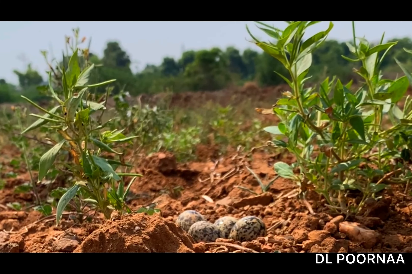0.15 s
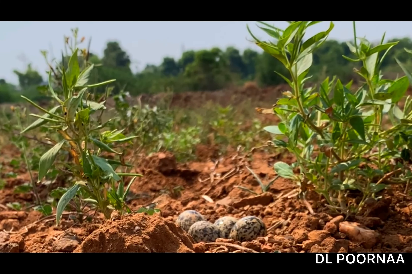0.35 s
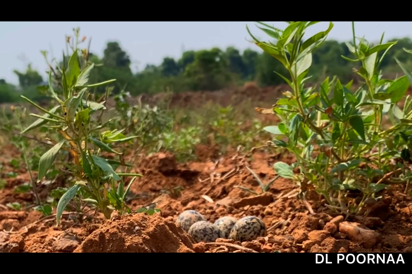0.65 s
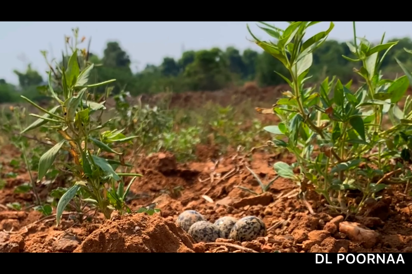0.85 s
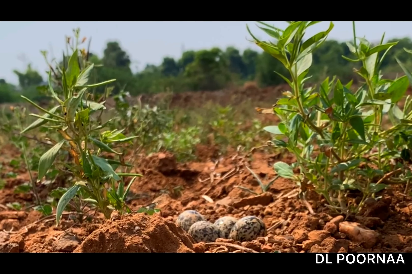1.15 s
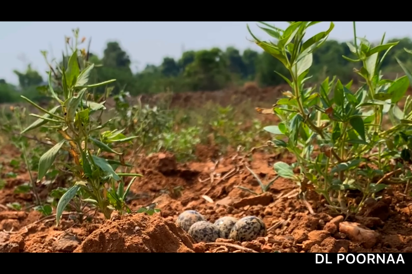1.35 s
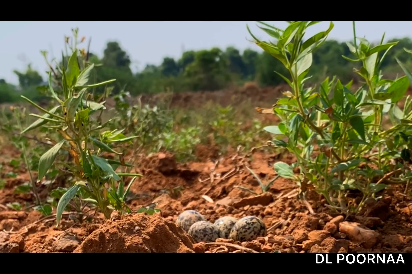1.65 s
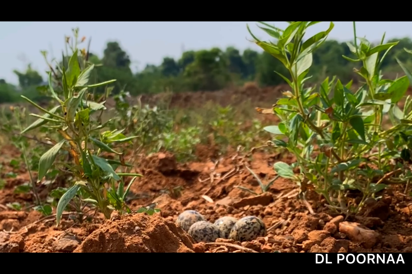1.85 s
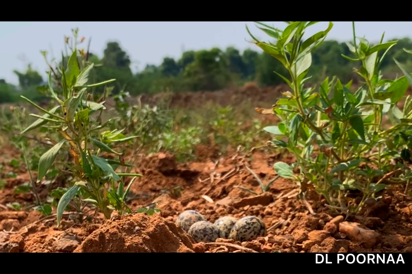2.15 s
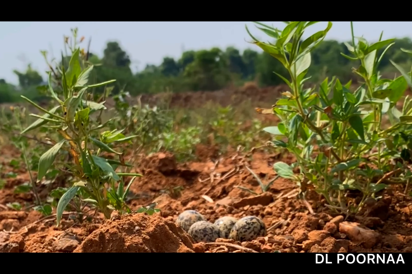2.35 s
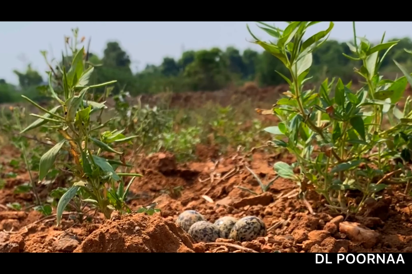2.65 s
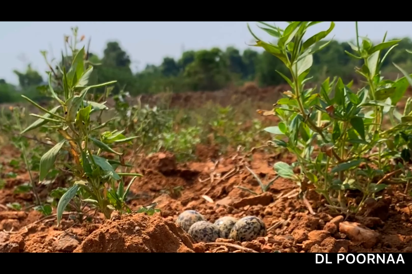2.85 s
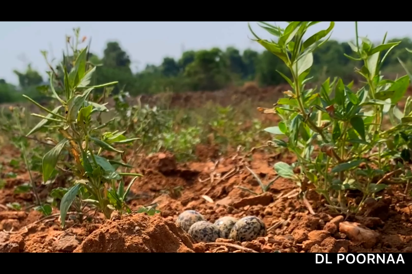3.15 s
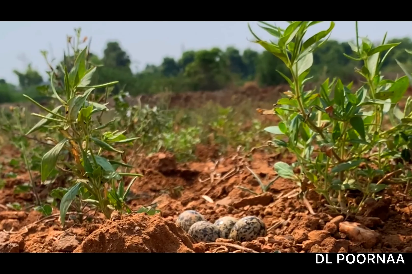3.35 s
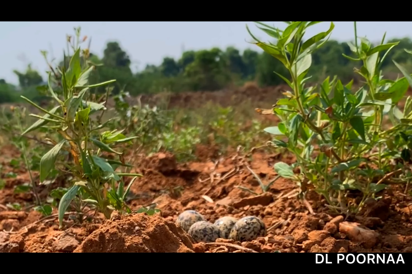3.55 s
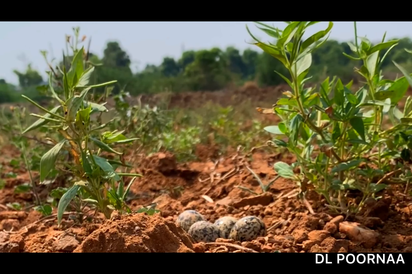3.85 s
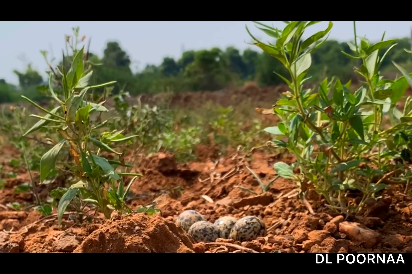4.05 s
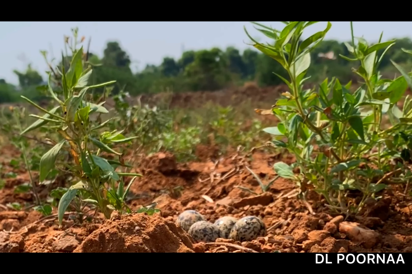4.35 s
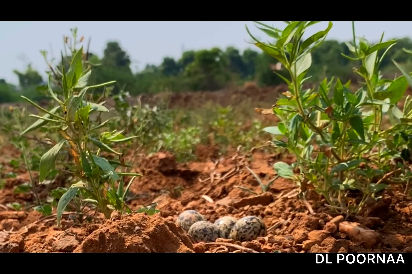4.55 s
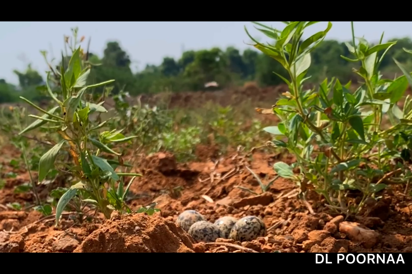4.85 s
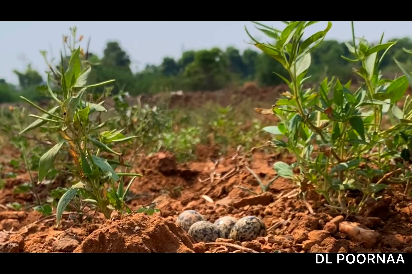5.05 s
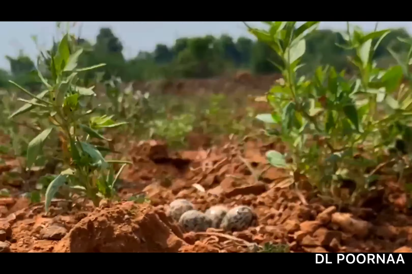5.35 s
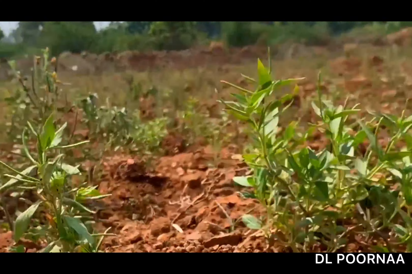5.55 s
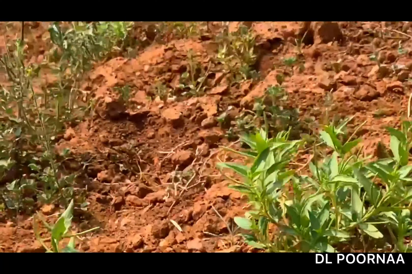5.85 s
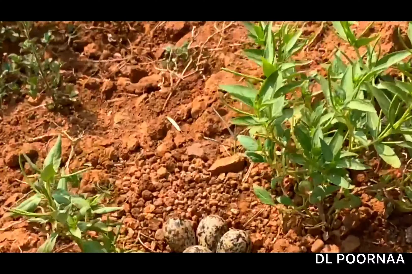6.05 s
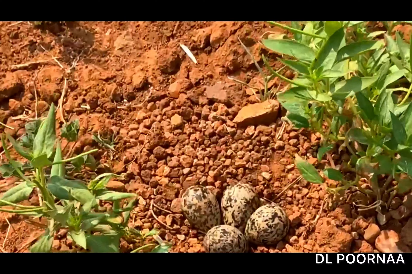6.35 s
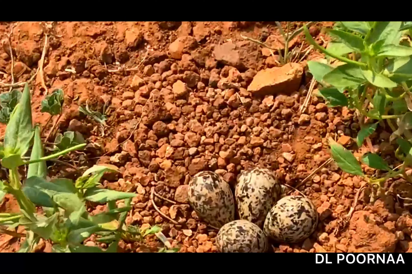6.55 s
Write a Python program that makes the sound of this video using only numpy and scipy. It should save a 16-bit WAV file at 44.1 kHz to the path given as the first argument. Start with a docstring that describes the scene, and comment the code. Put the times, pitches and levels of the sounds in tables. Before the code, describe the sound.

In an open field, low wind rumble presses unevenly on a small hand-held stereo microphone. Within the first second the grip shifts: heavy bassy jolts, dull finger knocks and tiny bright crackles. After that the rumble settles into soft uneven swells with weaker bumps, while faint birds chip, whistle and slide downward on both sides over a very quiet hush.

```python
"""Low rumbles swell and jolt as wind buffets a small hand-held recorder in an open field; a few finger
knocks and tiny crackles reach it through the case, and distant birds call left and right over a hush.
The rumble is noise-driven low resonances with brief swings on top, the knocks are decaying case modes,
the birds are gliding sines with scattered echoes, and the hush is shaped random spectra."""
import sys
import numpy as np
from scipy import signal
from scipy.io import wavfile
from scipy.ndimage import uniform_filter1d

SR = 44100
rng = np.random.default_rng(int(sys.argv[2]) if len(sys.argv) > 2 else 0)


def store_wav(level_fs):
    """Save 16-bit WAV to argv[1]."""
    pcm = np.round(np.clip(np.atleast_2d(level_fs), -1, 1) * 32767)
    wavfile.write(sys.argv[1], SR, pcm.T.astype(np.int16))


def gain_from_db(level_db):
    """Turn a decibel level (scalar or array-like) into a linear amplitude factor."""
    decades = np.asarray(level_db, float) / 20
    return 10 ** decades


N = 295760

# sudden jolts of air or hand: t/s, level/dB, f/Hz
JOLTS = [(0.3, -17.5, 64), (0.372, -13.5, 65), (0.427, -19.5, 76.4), (0.702, -7, 112), (0.718, -21, 102),
         (0.733, -17, 114), (0.785, -18, 80.5), (1.099, -28, 84), (2.225, -26, 98), (3.227, -27.5, 101),
         (3.661, -28, 92), (4.416, -23.5, 88.5), (4.788, -27, 88.5), (5.177, -25, 77)]
GLIDE_BEND = 0.72  # under 1: the pitch of a held note moves fast first, then levels


def evened(x):
    """Scales to rms 1."""
    return x / np.sqrt(np.mean(x ** 2))


def read(points, hz):
    """Reads a table on a log frequency axis."""
    f, value = np.transpose(points)
    return np.interp(np.log(hz + 1), np.log(f + 1), value)


def halves(difference):
    """Splits a left-right difference evenly: half up on the left, half down on the right."""
    return np.array([[0.5], [-0.5]]) * difference


def add(mix, s, sound, pan_db):
    """Adds a sound to both channels at time s; a positive pan_db leans left."""
    part = mix[:, round(s * SR):][:, :sound.shape[-1]]
    panned = sound * gain_from_db(halves(pan_db))
    part += panned[:, :part.shape[1]]


def hush():
    """The hush of the field and the microphone hiss: random short-time spectra with faint drifting patches."""
    # spectrum of the hush, then of the hiss: f/Hz, relative density/dB per Hz
    hush_shape = [(60, -15.5), (110, -11), (190, -21.5), (357, -26.5), (700, -28.5), (2500, -41),
                  (7500, -47.5), (16000, -49)]
    # likeness of the two channels: f/Hz, likeness (0 to 1)
    channel_likeness = [(150, 0.054), (640, 0.5), (3100, 0.36), (7000, 0.062)]
    # balance of the two channels: f/Hz, left-right level/dB
    channel_lean = [(150, 0), (700, -3), (2400, -2.5), (8000, 0.5)]
    level_db = -58  # rms of the part above some 200 Hz
    frames = N // 256 + 5
    hz = np.fft.rfftfreq(1024, 1 / SR)[:, None]
    a, b, c, d, patches = rng.standard_normal((frames, 513, 5)).T
    patches = uniform_filter1d(patches, size=14, axis=0)  # across frequency
    patches = evened(uniform_filter1d(patches, size=16, axis=1))  # across time
    same = np.clip(read(channel_likeness, hz), -1, 1)
    left = a + 1j * b
    right = same * left + np.sqrt(1 - same ** 2) * (c + 1j * d)
    shape = gain_from_db(read(hush_shape, hz)) * (hz > 50) * (hz < 15720)
    lean_db = np.array([0.5, -0.5])[:, None, None] * read(channel_lean, hz)
    spectra = np.array([left, right]) * shape * gain_from_db(1.01 * patches + lean_db)
    sound = signal.istft(spectra, nperseg=1024, noverlap=768)[1][:, :N]
    return gain_from_db(level_db) * evened(sound) * np.linalg.norm(shape) / np.linalg.norm(shape[5:])


def whistle(length, from_hz, to_hz, db, bend=1.3, waver=0.12, flutter_db=2.5):
    """A near sine that glides; moving air makes its pitch waver and its level flutter."""
    u = np.linspace(0, 1, round(length * SR))
    # averaging 200 samples shrinks the noise to 1 / sqrt(200); waver acts on that shrunken drift
    drift, flutter = uniform_filter1d(rng.standard_normal((2, 12000)), size=200)[:, :len(u)]
    hz = (from_hz + (to_hz - from_hz) * u ** bend) * (1 + waver * drift)
    level = gain_from_db(db + flutter_db * np.sqrt(200) * flutter)  # flutter_db is an rms swing
    envelope = level * signal.windows.tukey(len(u), 0.5)
    return envelope * np.sqrt(2) * np.sin(2 * np.pi * np.cumsum(hz) / SR)


def husky(tone, depth, size):
    """Fast random flutter spreads a tone into a rasp."""
    flutter = evened(uniform_filter1d(rng.standard_normal(12000), size=size))
    return tone * (1 + depth * flutter[:len(tone)])


def field(x, t60=0.5):
    """Bushes and ground scatter the calls: sparse echoes of random sign, one in every 20 samples."""
    taps = np.zeros((2, 22000))
    at = np.arange(200, 21980, 20) + rng.integers(0, 20, (2, 1089))
    np.put_along_axis(taps, at, rng.choice([-1.0, 1.0], at.shape), 1)
    taps *= gain_from_db(-60 * np.arange(22000) / SR / t60)
    return signal.oaconvolve(x, taps / np.linalg.norm(taps[0]), axes=1)[:, :N]


def twitter(count=2200):
    """Many far birds blur together: tiny glides at chance moments, most near 3.5 kHz."""
    # swells of the twitter ahead of its echoes: t/s, level/dB
    twitter_swells = [(.7, -75), (1.05, -63.5), (1.7, -70.5), (2, -82), (3.75, -72.5), (3.88, -66),
                      (4.08, -69), (4.3, -66.5), (4.9, -81), (5.4, -77), (6, -79)]
    out = np.zeros((2, N))
    for at, high, glide, size, side in rng.random((count, 5)):
        spread = high - glide
        hz = 3450 * 2.2 ** (spread * abs(spread) ** 0.5)
        call = whistle(0.0105 + 0.0357 * size, hz, hz * (0.8 + 0.4 * side), 0)
        add(out, at * N / SR, call, 8 * (size - 0.7))
    return evened(out) * gain_from_db(np.interp(np.arange(N) / SR, *np.transpose(twitter_swells)))


def slides(left):
    """Falling chirps of one side: clear from the left, husky from the right; each fades as it falls."""
    # slides down to one end tone: t/s, length/s, start f/Hz, level ahead of rasp and fade/dB, left-right level/dB
    slide_calls = [(0.27, 0.065, 7100, -75, 7), (1.307, 0.06, 6680, -61, -6),
                   (1.447, 0.056, 6590, -59.5, -3), (3.839, 0.095, 7030, -67.5, -11),
                   (3.976, 0.078, 6630, -63, -4), (4.596, 0.093, 7000, -69, 6),
                   (5.299, 0.1, 7260, -66.5, -3), (5.447, 0.051, 6940, -66, -3),
                   (6.152, 0.075, 6420, -71, -0.5), (6.59, 0.11, 7170, -66.5, -6)]
    out = np.zeros((2, N))
    for s, length, from_hz, db, pan_db in slide_calls:
        # a bend over 1 steepens the fall
        slide = whistle(length, from_hz, 5200, db, bend=1.4, waver=0.15)
        slide = husky(slide, 0 if left else 0.4, size=45)
        slide = slide * gain_from_db(np.linspace(1.5, -4, len(slide)))
        add(out, s, slide * ((pan_db > 0) == left), pan_db)
    return out


def birds_far():
    """Singers behind the bushes: husky slides, hoarse rising syllables and two tones sung at once."""
    # low hoarse syllables: t/s, length/s, start f/Hz, end f/Hz, level ahead of the rasp/dB
    hoarse_calls = [(5.336, .09, 2150, 2505, -67), (5.41, 0.084, 1743, 2113, -75),
                    (5.49, 0.062, 2100, 2450, -74)]
    # two-voiced notes, lower voice given: t/s, length/s, held f/Hz, rise to it/Hz, level of each voice/dB
    two_voiced = [(0.894, 0.042, 5740, 0, -71.5), (1.1, 0.048, 5600, 2, -74),
                  (1.6, 0.079, 5500, 151, -75.5), (2.232, 0.11, 6130, 498, -74.5),
                  (3.223, 0.053, 5700, 0, -68.5), (3.305, 0.042, 6200, -2, -77), (4.242, .1, 5800, 50, -83),
                  (5.734, 0.08, 5880, 350, -74.5), (6.372, 0.056, 6100, 500, -78.5)]
    upper_voice_hz = 926  # above the lower voice
    out = slides(False)
    for s, *note in hoarse_calls:
        call = whistle(*note, waver=0.3, flutter_db=3.5)
        add(out, s, husky(call, 1.0, size=70), -6)
    for s, length, hz, rise_hz, db in two_voiced:  # a negative rise falls, zero stays level
        for up_hz in (0, upper_voice_hz):
            held_hz = hz + up_hz
            voice = whistle(length, held_hz - rise_hz, held_hz, db, bend=GLIDE_BEND, waver=0.157)
            add(out, s, voice, -2.5)
    return out


def birds_left():
    """Clear slides and quick downward flicks from the open side, as short gliding sines."""
    # downward flicks: t/s, start f/Hz, level/dB
    flick_calls = [(2.114, 5200, -68), (2.166, 5580, -66.5), (2.185, 5110, -67.5), (2.439, 4380, -68),
                   (2.457, 4230, -67), (2.49, 5200, -65), (2.505, 4830, -67), (2.785, 3890, -67),
                   (3.14, 4430, -63.5), (3.879, 4200, -61)]
    length_s, fall = 0.0124, 0.234  # fall: share of the pitch lost
    out = slides(True)
    for s, hz, db in flick_calls:
        add(out, s, whistle(length_s, hz, hz * (1 - fall), db, bend=0.76), 5)
    return out


def chip(length, top_hz, end_hz, db):
    """The pitch climbs fast, tips over and falls; the voice rasps and is loudest at the top."""
    from_hz, rise_s = 1376, 0.014
    u = np.linspace(0, 1, round(length * SR))
    top = min(rise_s / length, 0.8)  # a chip climbs for 14 ms, never more than 0.8 of its length
    foot_hz = np.where(u < top, from_hz, end_hz)
    away = np.where(u < top, 1 - u / top, (u - top) / (1 - top))
    hz = top_hz + (foot_hz - top_hz) * away ** 2.195
    loudness = gain_from_db(2.1 * np.log2(hz / top_hz))  # 2.1 dB per octave
    tone = np.sin(np.pi * u) ** 0.36 * loudness * np.sin(2 * np.pi * np.cumsum(hz) / SR)
    return gain_from_db(db) * husky(tone, 0.65, size=70)


def birds_right():
    """Singers in view: whistles that glide up or down to a held tone or hold level, and a nearer bird's chips."""
    # whistled notes: t/s, length/s, held f/Hz, rise to it/Hz, level/dB
    held_notes = [(0.95, 0.055, 4300, 0, -70), (0.963, 0.056, 3700, 1009, -66.5),
                  (1.272, 0.041, 7400, 902, -66.5), (1.298, 0.064, 3660, 148, -69),
                  (1.562, 0.11, 3400, -100, -68), (1.736, 0.046, 3700, 350, -71),
                  (2.513, 0.024, 3890, 0, -70), (3.294, 0.052, 4600, -2, -75), (3.9, 0.037, 3560, 202, -73),
                  (3.891, 0.079, 2600, 1107, -76), (4.29, 0.045, 3350, -500, -69),
                  (4.6, 0.036, 3900, 297, -72), (3.974, 0.058, 4280, 100, -71),
                  (4.171, 0.046, 3750, 1050, -65), (4.428, 0.048, 4000, 391, -70),
                  (4.712, 0.035, 4800, 698, -69), (3.9, 0.052, 4700, 103, -73),
                  (5.508, 0.11, 3950, 702, -71), (5.6, 0.17, 3750, -150, -80),
                  (1.127, 0.064, 4330, 306, -74)]
    # chips: t/s, length/s, top f/Hz, end f/Hz, peak level ahead of the rasp/dB
    chip_calls = [(1.081, 0.024, 3380, 1400, -51.5), (1.137, 0.021, 3305, 1470, -54.5),
                  (2.842, 0.052, 3340, 3160, -56.5), (2.889, 0.03, 3256, 3110, -55),
                  (2.911, 0.019, 3410, 3050, -61)]
    out = np.zeros((2, N))
    for s, length, hz, rise_hz, db in held_notes:  # a negative rise falls, zero stays level
        add(out, s, whistle(length, hz - rise_hz, hz, db, bend=GLIDE_BEND), -4)
    for s, *call in chip_calls:
        add(out, s, chip(*call), -9)
    return out


def ring(modes, t, lead=0):
    """Sums the decaying sines of struck modes."""
    return sum(gain_from_db(db - 60 * t / t60) * np.sin(2 * np.pi * hz * t + lead) for hz, db, t60 in modes)


def knocks():
    """Finger knocks: a sharp tick and a duller case ring that swells in milliseconds, unlike at each port."""
    # taps on the case: t/s, body gain/dB, tick gain/dB, left-right level/dB
    case_taps = [(.382, -28.5, -29.5, -7.5), (0.442, -41, -47, -15), (0.691, -34.5, -29.5, -8),
                 (0.695, -30.5, -48, -5), (0.758, -35, -54, -5), (0.794, -46, -50, -7),
                 (2.254, -43.5, -60, -12), (5.763, -39, -73, -11)]
    # dull modes of the case: f/Hz, relative level ahead of the onset/dB, t60/s
    body_modes = [(246, 16, 0.0081), (389, 21, 0.0069), (596, 4, 0.016), (1013, -0.5, 0.014)]
    # sharp modes of the tick: f/Hz, relative level ahead of the onset/dB, t60/s
    tick_modes = [(1190, 5.5, 0.0037), (1640, 3.5, 0.0048), (3080, 4, 0.0024), (3560, -1, 0.002),
                  (7300, -13, 0.0028)]
    t = np.arange(2000) / SR
    out = np.zeros((2, N))
    body = ring(body_modes, t, lead=np.array([[1.2], [0]])) * (1 - np.exp(-t / 0.0026))
    tick = ring(tick_modes, t) * (1 - np.exp(-t / 0.00051))  # a fingertip is soft: no hard edge
    for s, body_db, tick_db, pan_db in case_taps:
        add(out, s, gain_from_db(body_db) * body + gain_from_db(tick_db) * tick, pan_db)
    return out


def crackles():
    """Tiny bright crackles of the grip: one 5.5 kHz mode that dies within a millisecond."""
    # crackles: t/s, level ahead of the onset/dB
    grip_crackles = [(.382, -21.5), (.462, -28.5), (.501, -38), (.749, -33.5)]
    t = np.arange(2000) / SR
    out = np.zeros((2, N))
    for s, db in grip_crackles:
        add(out, s, ring([(5500, db, 0.00064)], t) * (1 - np.exp(-t / 0.000072)), 4)
    return out


def shake(hz, width_hz, pan_db, lead, own=0.45):
    """Turbulence drives one low resonance; each port also feels eddies of its own (lead: left ahead, rad)."""
    r = np.exp(-np.pi * width_hz / SR)
    z = rng.standard_normal((3, N)) + 1j * rng.standard_normal((3, N))
    slow = signal.lfilter([(1 - r) ** 2], [1, -2 * r, r * r], z)
    ports = slow[0] * np.exp([[1j * lead], [0]]) + own * slow[1:]
    ports = (ports * np.exp(2j * np.pi * hz * np.arange(N) / SR)).real  # shifts the slow noise up to hz
    return evened(ports) * gain_from_db(halves(pan_db))


def jolts():
    """A swing or two per jolt: the ports swing out of step, a little less so by hand, where it dies sooner."""
    out = np.zeros((2, N))
    for at, db, hz in JOLTS:
        turns = (np.arange(4410) / SR - 0.02) * hz  # starts 20 ms ahead of the peak
        by_hand = 0.35 < at < 1  # s, while the hand shifts its grip
        # left port's lead in rad, and the swings a jolt takes to die down
        lead, swings = (1.72, 0.43) if by_hand else (2.2, 1.6)
        swell = np.exp(np.where(turns < 0, -(turns / 0.42) ** 2, -turns / swings))
        swing = np.cos(2 * np.pi * turns + halves(lead) - 2.9)
        add(out, at - 0.02, gain_from_db(db) * swell * swing, 0)
    return out


def rumble():
    """The body sways and twists in the gusts, and shakes on with a faint higher shudder after each jolt."""
    # strength of the wind on the recorder, ahead of the puffs: t/s, level/dB
    gust_levels = [(0, -39), (.6, -37), (1.2, -41), (1.8, -42), (2.25, -40), (2.7, -44.5), (3.3, -39.5),
                   (3.95, -44), (4.6, -37), (5.2, -38.5), (5.6, -42.5), (6.2, -42), (6.7, -40)]
    twist_db = -5.5  # under the sway
    after_sway_db, after_twist_db, after_shudder_db = -14.5, -12.5, -28  # relative to the jolts
    after_t60_s = 0.49
    t = np.arange(N) / SR
    puffs = evened(signal.resample(rng.standard_normal(80), N))  # the air arrives in lumps, some six a second
    wind = gain_from_db(np.interp(t, *np.transpose(gust_levels)) + 2.6 * puffs)
    after = np.sqrt(sum((t > at) * gain_from_db(db - 60 * abs(t - at) / after_t60_s) ** 2 for at, db, hz in JOLTS))
    after = uniform_filter1d(uniform_filter1d(after, size=700), size=700)  # it builds up over some 20 ms
    sway_level = np.hypot(wind, gain_from_db(after_sway_db) * after)
    twist_level = np.hypot(gain_from_db(twist_db) * wind, gain_from_db(after_twist_db) * after)
    # the ports move nearly together in the sway, nearly against each other in the twist
    sway = shake(hz=48, width_hz=30.8, pan_db=2.4, lead=0.9) * sway_level
    twist = shake(hz=82, width_hz=38, pan_db=-2, lead=-2.5) * twist_level
    shudder = shake(hz=170, width_hz=134, pan_db=-2.5, lead=2.16) * gain_from_db(after_shudder_db) * after
    return sway + twist + shudder


def scene():
    """Wind and knocks act on the recorder itself; birds come across the field, the twitter as echo alone."""
    far, clear, near = birds_far(), birds_left(), birds_right()
    # the open left side has less to echo from
    echoes = gain_from_db(2.0) * field(twitter() + far + 0.5 * clear + near)
    far_direct = gain_from_db(-3) * far  # the bushes stand before these birds
    calls = far_direct + clear + near + echoes
    return hush() + calls + knocks() + crackles() + jolts() + rumble()


def low_pass(x):
    """Removes everything above the highest recorded frequency."""
    return signal.sosfilt(signal.butter(12, 16620, fs=SR, output="sos"), x)


def record(dry):
    """The microphones lose the deepest bass, under some 25 Hz."""
    bass_cut = signal.butter(2, 25.2, "high", fs=SR, output="sos")
    thinned = signal.sosfiltfilt(bass_cut, dry)
    return low_pass(thinned)


dry = scene()
out = record(dry)
store_wav(out)
```